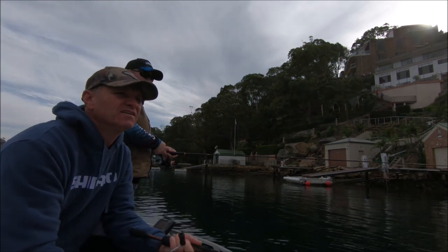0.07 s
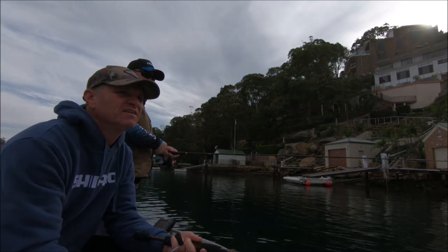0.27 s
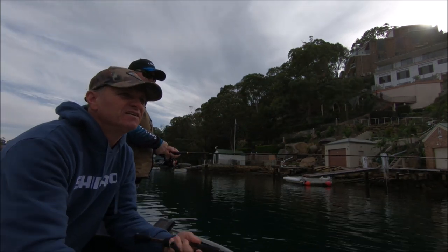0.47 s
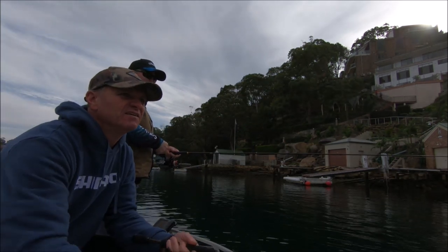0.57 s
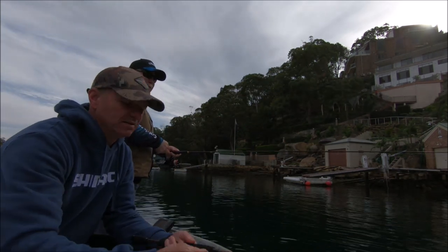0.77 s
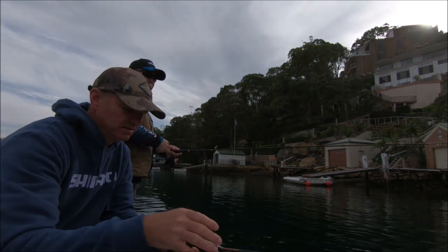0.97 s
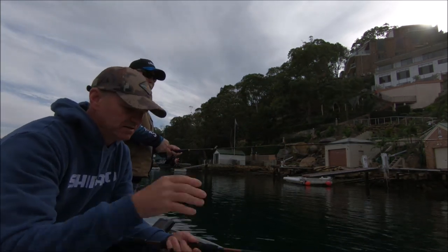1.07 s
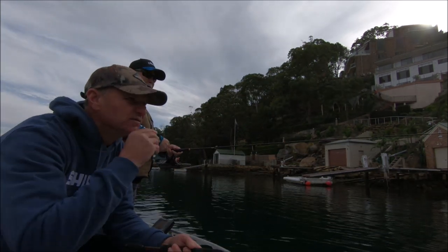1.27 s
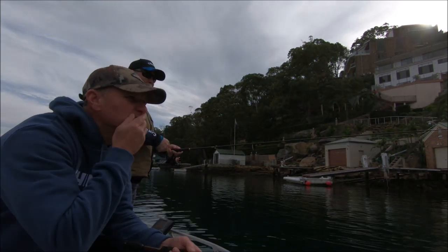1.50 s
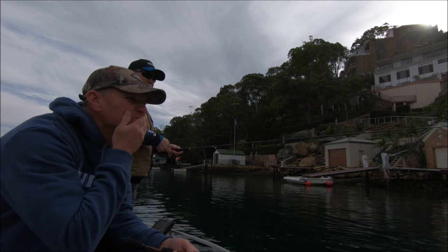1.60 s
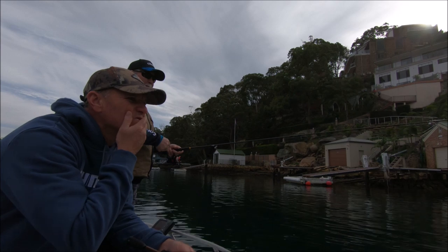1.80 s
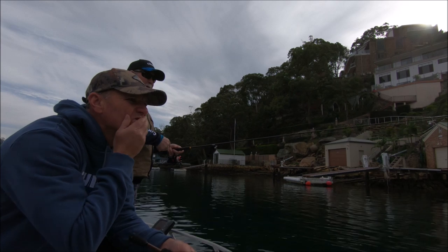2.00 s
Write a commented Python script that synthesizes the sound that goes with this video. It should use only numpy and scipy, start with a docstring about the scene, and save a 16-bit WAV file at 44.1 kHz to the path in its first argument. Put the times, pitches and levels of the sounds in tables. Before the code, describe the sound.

Sharp metallic clicking of a fishing reel on a small boat, faint line hiss, low water thuds

```python
"""A hull hums and a bird note slips past as a rod swishes; then a reel snaps and rattles and line hisses out.
An angler is casting from a small boat in a quiet, wooded bay. The reel is short noise cracks with ringing modes,
the swish and hiss are one coloured noise, and the whirr of the spool is narrow-band noise.
Water bumps dully on the hull as low wavering tones in slosh. The bird whistles gliding tones from the shore,
each with a blurred glow from the slope, over a faint wash of water and trees."""
import sys
import numpy as np
from scipy import signal
from scipy.fft import rfft, irfft, next_fast_len
from scipy.io import wavfile
from scipy.ndimage import uniform_filter1d

SR = 44100
rng = np.random.default_rng(int(sys.argv[2]) if len(sys.argv) > 2 else 0)


def materialize(psi):
    """Save the field psi as 16-bit PCM at rate SR to the path in sys.argv[1].

    A 1-D psi becomes a single channel; in a 2-D psi each row is a channel.
    """
    bounded = np.clip(np.atleast_2d(psi).T, -1, 1)
    quanta = np.round(bounded * 32767).astype(np.int16)
    wavfile.write(sys.argv[1], SR, quanta)


N = 90404  # samples, about 2.05 s


def undb(db):
    """Decibels to gain."""
    return 10 ** (np.asarray(db) / 20)


def unit(x):
    """Scale to rms 1."""
    return x / np.sqrt(np.mean(x ** 2))


def curve(points, t):
    """Gain along a (start_s, level_db) curve, straight in dB between its points."""
    return undb(np.interp(t, *np.array(points).T))


def colour(x, points, focus_hz=4000, falloff_db=0):
    """Minimum-phase filter through (freq_hz, level_db) points, tilted in dB per octave away from a focus."""
    size = next_fast_len(2 * len(x))
    octave = np.log2(np.maximum(np.fft.rfftfreq(size, 1 / SR), 1))
    hz, db = np.array(points).T
    distance = np.minimum(abs(octave - np.log2(focus_hz)), 2)  # the tilt levels out two octaves away
    db = np.interp(octave, np.log2(hz), db) - falloff_db * distance
    # folding the cepstrum makes the response causal
    cepstrum = irfft(np.log(undb(db)), size)
    cepstrum[1:size // 2] *= 2
    cepstrum[size // 2 + 1:] = 0
    response = np.exp(rfft(cepstrum))
    return irfft(rfft(x, size) * response, size)[:len(x)]


def noise(points):
    """Noise of rms 1 with the given spectrum."""
    return unit(colour(rng.standard_normal(N), points))


def walk(rate_hz):
    """Smooth random wander of rms 1: noise averaged twice over 1 / rate_hz."""
    width = max(int(SR / rate_hz), 1)
    once = uniform_filter1d(rng.standard_normal(N), width)
    return unit(uniform_filter1d(once, width))


def fade(t, t60):
    """Exponential decay by 60 dB in t60 seconds."""
    return np.exp(-np.log(1000) * t / t60)


def add(out, start, x):
    """Mix a sound in at a time in seconds."""
    i = max(int(start * SR), 0)
    out[i:i + len(x)] += x[:len(out) - i]


def echo(x, t, t60, delay):
    """Diffuse reflections: convolution with decaying noise that begins after a delay in seconds."""
    tail = rng.standard_normal(N) * fade(t, t60) * (t > delay)
    return signal.fftconvolve(x, tail / np.linalg.norm(tail))[:N]


# Contacts of the reel: start_s, level_db, focus_hz, falloff_db (per octave either side; negative rises),
# chatter_s (time constant)
REEL_CONTACTS = [(0.1819, -11, 4670, 9, 0.0012), (0.1948, -9, 1470, 10, 0.0028),
                 (0.1996, -30, 2700, -9, 0.0024), (0.207, 2, 4560, 3, 0.0033),
                 (0.211, 4.5, 2700, 6.5, 0.0029), (0.22, -20, 3600, -6.5, 0.0022),
                 (0.2236, 1, 8000, 22.5, 0.0075), (0.233, 2.5, 4080, 0.5, 0.00037),
                 (0.2346, 1.5, 2780, 1.5, 0.0019), (0.2404, -12.5, 3030, -3.5, 0.0017),
                 (0.2532, 0.5, 3560, 7, 0.00054), (0.2573, -15, 4000, -6, 0.0022),
                 (0.2689, -2, 4040, 6.5, 0.0017), (0.2732, -7, 3420, 1, 0.0011)]
# Ringing modes of reel and rod: pitch_hz, level_db (relative), t60_s
REEL_MODES = [(1552, 5.5, 0.025), (1637, -7, 0.044), (2274, -10, 0.13), (2160, -8, 0.031),
              (2770, -9, 0.039), (2860, 5, 0.036), (3008, 1, 0.057), (3480, 0.5, 0.026), (4118, 6, 0.03),
              (4340, -27, 0.023), (4666, -2.5, 0.027), (4825, 9.5, 0.025), (6580, -2, 0.048)]
# Spectrum of one contact's crack: freq_hz, level_db
CRACK_SPECTRUM = [(150, -43), (300, -8), (500, -8.5), (1000, -9.5), (1300, -5.5), (1600, -2), (3000, -1),
                  (3750, -5), (4700, -1), (5700, -4), (7300, -2), (8200, -15.5), (10300, -11),
                  (11200, -25.5), (14000, -30), (15500, -34)]
CRACK_DB, RING_DB = -3.5, -39.5
RING_ATTACK_S = .0006
DECK_DB, DECK_T60_S, DECK_DELAY_S = -16.5, 0.15, 0.0063


def reel(t):
    """Each contact is a short chattering crack that rings the same modes; the deck scatters it."""
    out, age = np.zeros(N), t[:SR // 8]
    attack = 1 - np.exp(-age / RING_ATTACK_S)
    for start, db, focus_hz, falloff_db, chatter in REEL_CONTACTS:
        grit = rng.standard_normal(len(age)) * age * np.exp(-age / chatter)
        crack = colour(grit / np.linalg.norm(grit), CRACK_SPECTRUM, focus_hz, falloff_db)
        ring = np.zeros(len(age))
        for hz, mode_db, t60 in REEL_MODES:
            # the contact's tilt also weights the modes
            gain = undb(mode_db - falloff_db * abs(np.log2(hz / focus_hz)))
            ring += gain * fade(age, t60) * np.sin(2 * np.pi * (hz * age + rng.random()))
        contact = undb(CRACK_DB) * crack + undb(RING_DB) * ring * attack
        add(out, start, undb(db) * contact)
    return out + undb(DECK_DB) * echo(out, t, DECK_T60_S, DECK_DELAY_S)


# Air of the cast, over time: start_s, level_db
SWISH_LEVEL = [(0, -62), (.06, -66), (.17, -67.5), (.33, -70), (.5, -75.5), (.8, -97.5)]
# Spectrum of swish and hiss: freq_hz, level_db
SWISH_SPECTRUM = [(500, 4), (800, 9), (1300, 0), (2200, 5), (3000, -8.5), (3600, -6), (4300, 0),
                  (5400, -14), (6500, -10), (9000, -21.5), (14000, -34.5)]
# Low whirr of line leaving the spool, over time: start_s, level_db
WHIRR_LEVEL = [(.25, -77.5), (.38, -66), (.416, -70.5), (.423, -60.5), (.44, -61), (.47, -69), (.56, -69),
               (.72, -73), (.9, -87)]
WHIRR_HZ, WHIRR_WIDTH_HZ = 754, 225  # centre, and bandwidth of each of two passes


def cast(t):
    """The swish fades into the hiss of running line, with a hollow whirr of resonant noise off the spool."""
    band = signal.iirpeak(WHIRR_HZ, WHIRR_HZ / WHIRR_WIDTH_HZ, fs=SR)
    once = signal.lfilter(*band, rng.standard_normal(N))
    whirr = unit(signal.lfilter(*band, once))
    swish = noise(SWISH_SPECTRUM)
    return swish * curve(SWISH_LEVEL, t) + whirr * curve(WHIRR_LEVEL, t)


# Bumps of water on the hull: peak_s, level_db, pitch_hz, rise_s, fall_s (time constants)
BUMPS = [(.08, -67, 70, 0.025, 0.048), (0.221, -51, 66, 0.069, 0.029), (.35, -57.5, 32, 0.062, 0.016),
         (0.662, -50.5, 75, 0.0067, 0.021), (0.851, -47, 52, 0.064, 0.028), (0.957, -46, 60, 0.049, 0.039),
         (1.111, -51, 62, 0.047, 0.052), (1.194, -36.5, 76, 0.021, .028), (1.251, -43, 95, 0.032, 0.015),
         (1.31, -46.5, 46, 0.044, 0.022), (1.462, -54, 54, 0.0099, 0.024), (1.58, -51, 60, 0.053, 0.06),
         (1.68, -65, 54, 0.025, 0.095), (1.768, -44, 82, 0.042, 0.043), (1.938, -54.5, 65, 0.083, 0.11)]
# Overtones of a bump: multiple (of its pitch), level_db (relative)
BUMP_TONES = [(1, -1.5), (2.35, -17)]
# Spectrum of a bump's slosh: freq_hz, level_db
SLOSH_SPECTRUM = [(8, -32.5), (18, -18.5), (30, -0.5), (55, -2.5), (80, 1.5), (115, -5), (190, -7.5),
                  (260, -20.5), (400, -41.5), (900, -71)]
# Spectrum of the hull's hum: freq_hz, level_db
HUM_SPECTRUM = [(20, -6), (60, -6), (115, -16), (150, 1), (172, 0), (210, -5.5), (260, -6.5), (330, -18.5),
                (430, -28), (800, -61)]
# Hum of the hull, over time: start_s, level_db
HUM_LEVEL = [(0, -52.5), (.5, -54), (.8, -56.5), (1.1, -52.5), (1.25, -52.5), (1.37, -53.5), (1.42, -62.5),
             (1.47, -55.5), (1.8, -54.5), (2.05, -55)]
SLOSH_DB = -1
PITCH_WANDER, WANDER_RATE_HZ = 0.086, 44  # rms share of the pitch, and its speed


def hull(t):
    """A hollow hum, and soft bumps of water: each a low wavering tone wrapped in slosh."""
    out = np.zeros(N)
    wander = 1 + PITCH_WANDER * walk(WANDER_RATE_HZ)
    slosh = undb(SLOSH_DB) * noise(SLOSH_SPECTRUM)
    for peak, db, hz, rise, fall in BUMPS:
        cycles = hz * np.cumsum(wander) / SR + rng.random()
        tone = np.zeros(N)
        for multiple, tone_db in BUMP_TONES:
            tone += undb(tone_db) * np.sqrt(2) * np.sin(2 * np.pi * multiple * cycles)
        swell = np.exp(-np.where(t < peak, (peak - t) / rise, (t - peak) / fall))
        out += undb(db) * swell * (tone + slosh)
    return out + curve(HUM_LEVEL, t) * noise(HUM_SPECTRUM)


# Bird notes: start_s, length_s, first_hz, middle_hz, last_hz, level_db, octave_db (overtone, relative),
# roughness (0-1)
BIRD_NOTES = [(0.002, 0.033, 2840, 2976, 3030, -68.5, -5, 0.5),
              (1.481, 0.058, 3940, 4000, 3880, -74.5, -27, 0.53),
              (1.518, 0.006, 3400, 3250, 3050, -68, -11, 0.55),
              (1.529, 0.061, 2550, 2752, 2750, -66.5, -6, 0.22),
              (1.587, 0.016, 3470, 3690, 3820, -68, -21, .5),
              (1.614, 0.028, 3610, 4194, 4213, -56, -51, 0.09),
              (1.655, .018, 3400, 3190, 3250, -61, -11.5, 0.42),
              (1.675, 0.017, 3290, 3423, 3090, -59.5, -13.5, .3),
              (1.849, 0.0224, 2520, 2745, 2570, -69, -9, 0.8)]
NOTE_ATTACK_S, NOTE_RELEASE_S = 0.0063, 0.0085
WARBLE, WARBLE_RATE_HZ = .05, 600  # rms share of the pitch at full roughness, and its speed
SHORE_DB, SHORE_BLUR_HZ, SHORE_T60_S = -3, 375, .65


def bird(t):
    """Quick whistled notes glide through their pitch; the wooded slope returns each as a blurred, fading glow."""
    out, age = np.zeros(N), t[:SR // 2]
    for start, length, first_hz, middle_hz, last_hz, db, octave_db, rough in BIRD_NOTES:
        # u runs from -1 to 1 over the note; its fourth power holds the middle pitch
        u = np.minimum(2 * age / length - 1, 1)
        end_hz = np.where(u < 0, first_hz, last_hz)
        hz = middle_hz + (end_hz - middle_hz) * u ** 4
        warble = 1 + WARBLE * rough * walk(WARBLE_RATE_HZ)[:len(age)]
        phase = 2 * np.pi * np.cumsum(hz * warble) / SR
        release = np.exp(-np.maximum(age - length, 0) / NOTE_RELEASE_S)
        swell = np.minimum(age / NOTE_ATTACK_S, 1) * release
        direct = swell * np.sqrt(2) * (np.sin(phase) + undb(octave_db) * np.sin(2 * phase))
        # random complex gain blurs the middle pitch into a narrow band
        scatter = (walk(SHORE_BLUR_HZ) + 1j * walk(SHORE_BLUR_HZ))[:len(age)]
        tone = np.exp(2j * np.pi * middle_hz * age)
        blurred = np.real(scatter * (tone + undb(octave_db) * tone ** 2))
        glow = blurred * np.minimum(age / length, 1) * fade(age, SHORE_T60_S)
        add(out, start, undb(db) * (direct + undb(SHORE_DB) * glow))
    return out


# Spectrum of the bay's wash: freq_hz, level_db
BAY_SPECTRUM = [(300, 2.5), (480, -0.5), (600, 2), (780, 7), (1000, -2.5), (1500, -5.5), (2500, -8),
                (3500, -9.5), (4400, -7), (5500, -11.5), (7500, -15.5), (10000, -23), (13000, -29.5),
                (15500, -51)]
BAY_DB, BAY_SWELL_DB, BAY_SWELL_RATE_HZ = -69, 0.16, 3.5


def bay():
    """Faint wash of water and trees: coloured noise whose level wanders slightly."""
    level = undb(BAY_DB + BAY_SWELL_DB * walk(BAY_SWELL_RATE_HZ))
    return level * noise(BAY_SPECTRUM)


SIDE_NOISE_DB = -93.5


def side_noise():
    """Very faint opposite-sign noise in the two channels."""
    spectrum = [(200, 1.5), (700, -2.5), (2000, -13), (5000, -7.5), (12000, 5), (15500, 6.5)]
    return undb(SIDE_NOISE_DB) * noise(spectrum) * np.array([[1], [-1]])


def scene():
    """All sources sit in the middle, over the very faint side noise."""
    t = np.arange(N) / SR
    return reel(t) + cast(t) + hull(t) + bird(t) + bay() + side_noise()


TOP_HZ = 15700


def record(dry):
    """A steep elliptic low-pass cuts the treble above TOP_HZ."""
    low_pass = signal.ellip(10, .2, 70, TOP_HZ, fs=SR, output="sos")
    return signal.sosfilt(low_pass, dry)


dry = scene()
out = record(dry)
materialize(out)
```